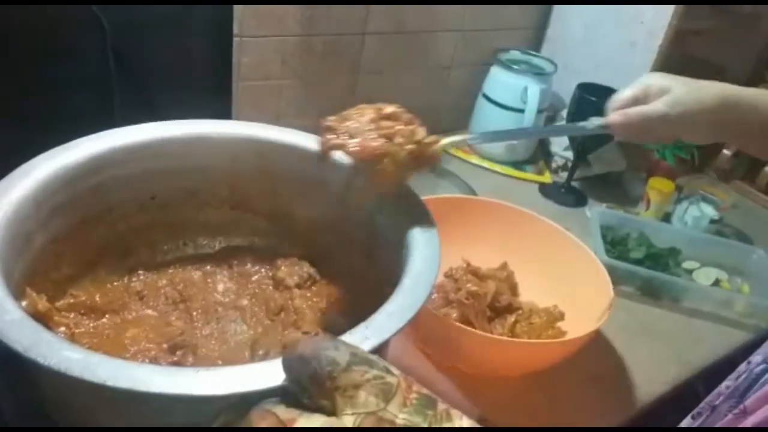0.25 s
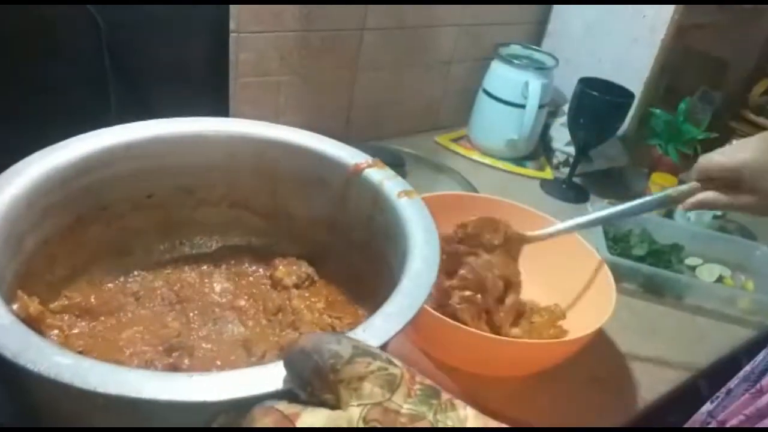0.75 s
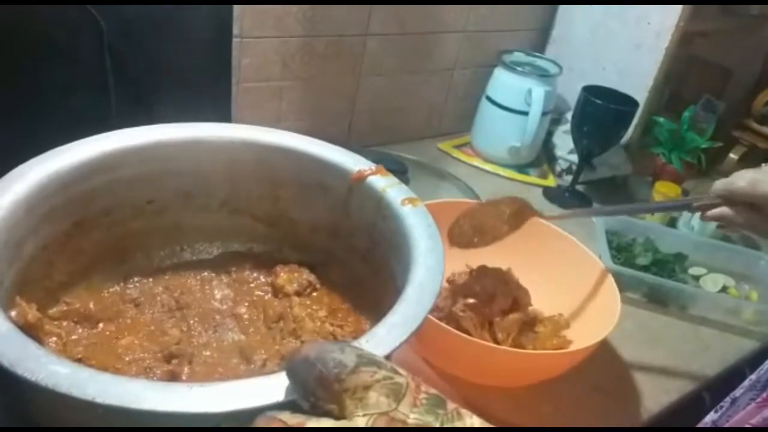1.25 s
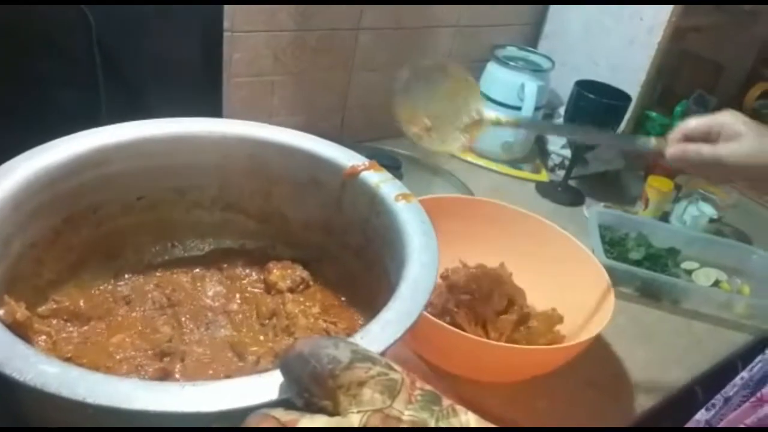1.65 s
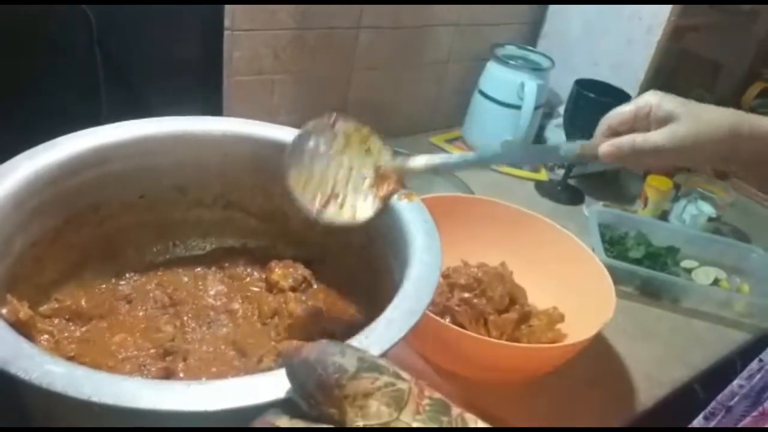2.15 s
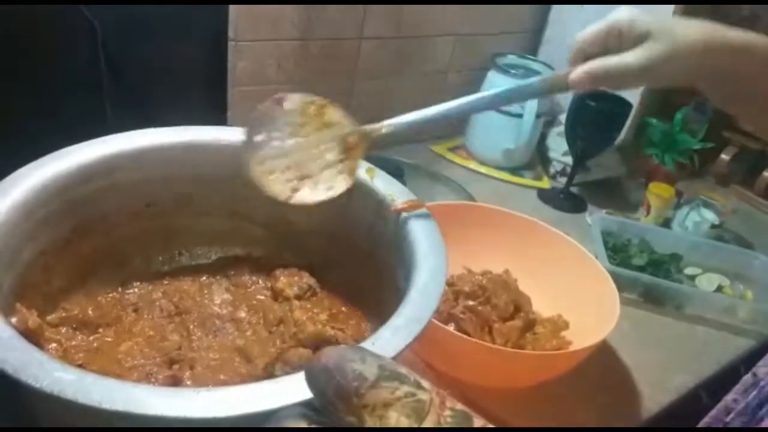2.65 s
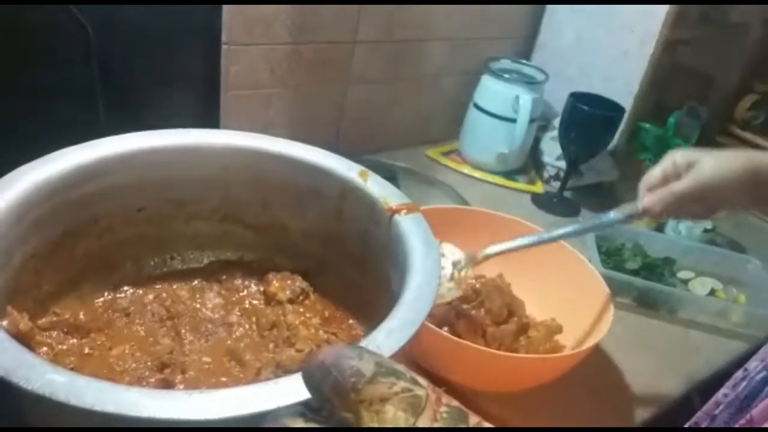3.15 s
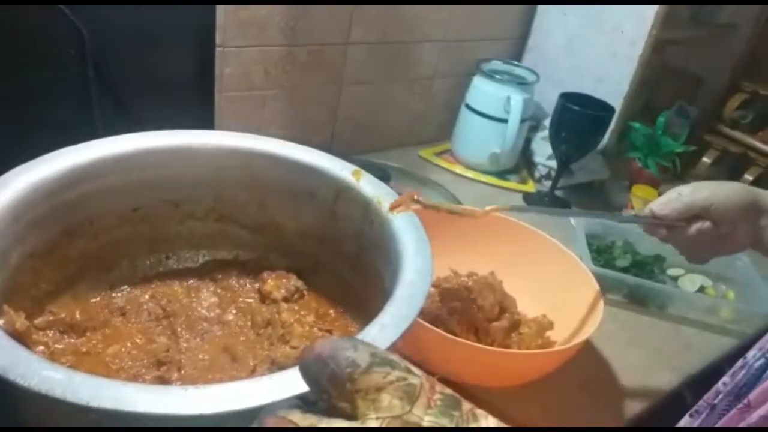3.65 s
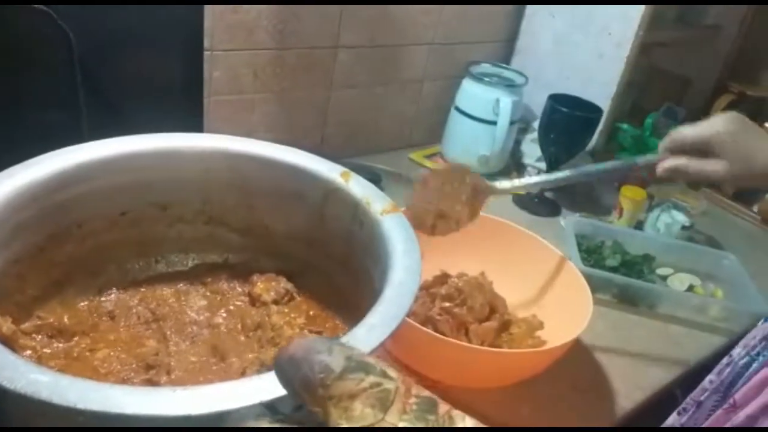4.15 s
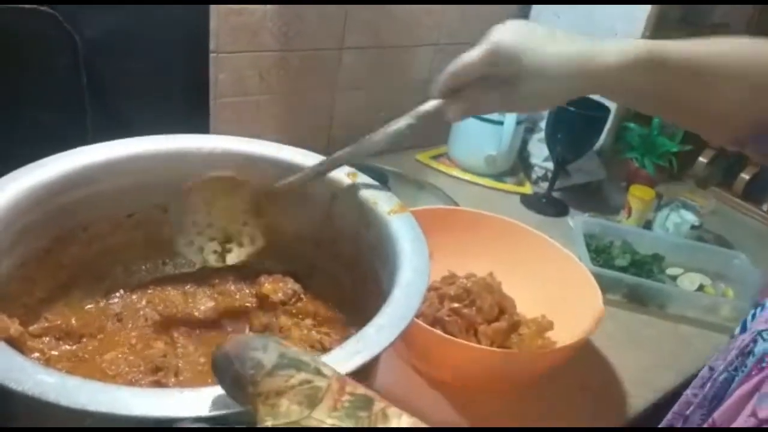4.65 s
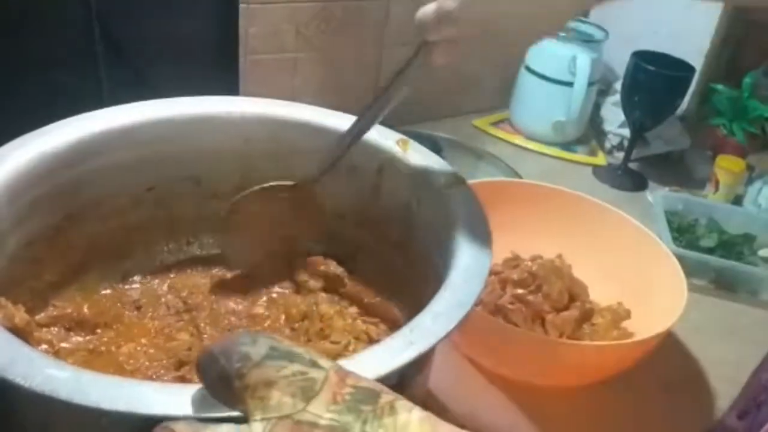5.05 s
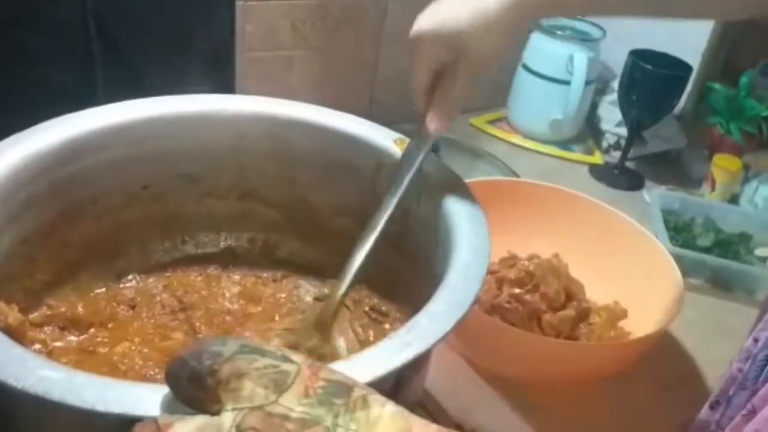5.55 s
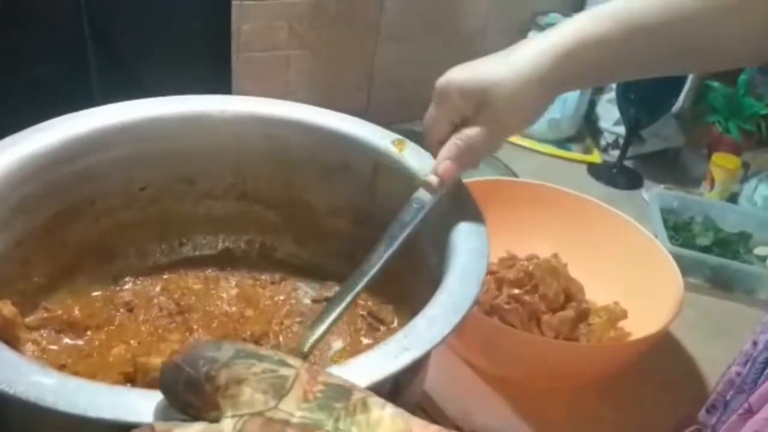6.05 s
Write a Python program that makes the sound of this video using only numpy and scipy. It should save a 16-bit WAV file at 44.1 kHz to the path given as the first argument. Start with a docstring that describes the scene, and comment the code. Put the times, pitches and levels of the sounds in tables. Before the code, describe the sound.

Gravy sizzles steadily in a big aluminium pot while a steel ladle clangs brightly on the rim, then scrapes and squeaks through the food.

```python
"""Ladle in a simmering pot

A steel ladle serves meat from a big aluminium pot while the gravy sizzles, in a small tiled kitchen.
It knocks on the rim and wall (decaying modes and noise), drags and squeals (stick-slip friction)
and bumps through the food (damped cycles). Frying is a dense train of clicks blurred by noise;
a faint resonance of the pot and low coloured noise lie beneath, and sparse reflections add the room."""
import sys
import numpy as np
from scipy import signal
from scipy.fft import rfft, irfft
from scipy.io import wavfile

SR = 44100
rng = np.random.default_rng(int(sys.argv[2]) if len(sys.argv) > 2 else 0)


def int16_out(signal):
    """Quantize to a 16-bit WAV file."""
    q = np.round(np.clip(np.atleast_2d(signal).T, -1, 1) * 32767)
    wavfile.write(sys.argv[1], SR, q.astype(np.int16))


N = 277830
TIME = np.arange(N) / SR
SECOND = TIME[:SR]  # time axis of a single decaying sound


def amp(db):
    """Level definition: decibels to amplitude ratio."""
    return 10 ** (np.asarray(db) / 20)


def unit(x):
    """Normalisation by mean power: scales to rms 1."""
    return x / np.sqrt(np.mean(x ** 2) + 1e-20)


def read(points, hz):
    """Interpolation on a logarithmic frequency axis."""
    f, value = np.transpose(points)
    return np.interp(np.log(hz + 1), np.log(f + 1), value)


def colour(x, spectrum):
    """Spectral shaping: weights each frequency, falling away below the lowest point, at rms 1."""
    hz = np.fft.rfftfreq(len(x), 1 / SR)
    low_fall = np.minimum(hz / spectrum[0][0], 1) ** 2
    gain = amp(read(spectrum, hz)) * low_fall
    return unit(irfft(rfft(x) * gain, len(x)))


def fade(t, t60):
    """Exponential decay: the level falls 60 dB in t60 seconds."""
    return np.exp(-np.log(1000) * t / t60)


def add(mix, s, sound):
    """Superposition: mixes a sound in at time s."""
    part = mix[round(s * SR):][:len(sound)]
    part += sound[:len(part)]


def crackle(per_s, spread_db):
    """Random impulse train: clicks of either sign, a few larger than the rest, at rms 1."""
    size = amp(spread_db * np.minimum(rng.exponential(1, N), 4))
    sign = rng.choice([-1, 1], N)
    happens = rng.random(N) < per_s / SR
    return unit(size * sign * happens)


def wander(per_s):
    """Band-limited random drift: straight lines between per_s random values a second, at rms 1."""
    knots = rng.standard_normal(N)
    return unit(np.interp(TIME * per_s, np.arange(N), knots))


# where the ladle touches the pot
PLACES = ["rim", "rim flat", "rim edge", "outer wall", "inner wall", "low wall"]
# modes of pot and ladle: f/Hz, t60/s, then relative level/dB when touched at each of the PLACES
MODES = [(926, 0.66, -28, -34, -34, -17, -28, -37), (1355, 0.56, -28, -35, -38, -20, -44, -32),
         (1591, 0.44, -53, -41, -37, -22, -46, -37), (1778, 0.6, -43, -60, -35, -35, -39, -44),
         (2040, 0.35, -50, -54, -62, -32, -55, -47), (2315, 0.38, -54, -60, -40, -23, -41, -57),
         (2692, 0.3, -36, -33, -46, -30, -48, -46), (2809, 0.55, -33, -30, -32, -34, -47, -42),
         (3104, 0.3, -32, -35, -27, -44, -23, -49), (3169, 0.35, -26, -30, -43, -25, -24, -37),
         (3205, 0.3, -45, -30, -41, -22, -19, -50), (3275, 0.3, -29, -40, -37, -27, -17, -32),
         (3375, 0.32, -25, -36, -43, -20, -30, -39), (3630, 0.35, -25, -31, -26, -28, -32, -45),
         (3677, 0.33, -47, -48, -38, -19, -32, -52), (3785, 0.3, -51, -46, -39, -22, -24, -34),
         (3829, 0.3, -37, -47, -33, -16, -27, -36), (4167, 0.33, -25, -28, -32, -18, -35, -32),
         (4220, 0.24, -35, -13, -33, -43, -22, -46), (4539, 0.3, -20, -31, -47, -19, -28, -37),
         (4717, 0.28, -17, -46, -49, -26, -42, -50), (4753, 0.28, -30, -36, -44, -16, -26, -49),
         (4961, 0.3, -18, -29, -37, -23, -31, -36), (5305, 0.28, -39, -43, -44, -41, -49, -33),
         (5615, 0.3, -20, -43, -44, -38, -30, -47), (5715, 0.3, -35, -41, -34, -40, -46, -32),
         (5980, 0.25, -19, -44, -43, -16, -44, -48), (6083, 0.3, -42, -45, -46, -18, -29, -46),
         (6592, 0.24, -17, -45, -34, -38, -29, -47), (6845, 0.28, -45, -48, -43, -22, -29, -51)]


def ring(place, swell_s, twin_db=-8, twin_life=0.92, beat_hz=21, twin_lag=0.4):
    """Modal superposition with beating: each mode has a shorter-lived twin, as the pot is not quite round."""
    t, out = SECOND, np.zeros(SR)
    for hz, t60, *levels in MODES:
        start, spread = rng.uniform(-1.0, 1, 2)  # start phase in cycles, side and size of the split
        side = np.sign(spread)
        height = hz / MODES[0][0]
        twin_hz = hz + beat_hz * np.sqrt(height) * side * (.5 + abs(spread))
        main = np.sin(2 * np.pi * (hz * t + start)) * fade(t, t60)
        twin = np.sin(2 * np.pi * (twin_hz * t + start - side * twin_lag)) * fade(t, t60 * twin_life)
        swell = 1 - np.exp(-t * height ** 2 / swell_s)  # low modes take longest to build up
        out += amp(levels[PLACES.index(place)]) * swell * (main + amp(twin_db) * twin)
    return out


# ladle on bare metal: t/s, place, ring level/dB, swell time constant of the lowest mode/s,
# then relative levels of the clash: pot body level/dB, middle level/dB, treble level/dB; clash t60/s
CLINKS = [(1.877, "rim", -1, 0.0071, -28.5, -44, -13, 0.28),
          (2.025, "rim flat", -5, .01, -35, -46, -39, 0.29),
          (2.039, "rim flat", -13, .01, -39, -46, -23, 0.13),
          (2.060, "rim flat", 0, 0.014, -43, -50, -24.5, 0.35),
          (2.198, "rim edge", 0.5, 0.027, -30, -34, -22.5, 0.16),
          (3.204, "outer wall", -1, 0.036, -26, -18, -14.5, 0.34),
          (4.765, "inner wall", 1, 0.012, -29, -32, -15, 0.3),
          (6.204, "inner wall", -23, .003, -31, -28.5, -33, 0.06)]
# spectra of the clash, and of duller contacts below: f/Hz, relative level per Hz/dB
BODY = [(60, -15), (115, -8), (230, -9.5), (310, -5.5), (370, 4), (460, 5), (560, -2), (700, -11),
        (1500, -44)]
MIDDLE = [(300, -25), (700, -2.5), (950, 6), (1400, 0), (1900, -2.5), (2600, -12), (4000, 2), (7000, -12),
          (12000, -37)]
TREBLE = [(1500, -15.5), (2800, -12), (3200, 0.5), (4500, 1), (6600, 2), (7700, -3.5), (8800, -19),
          (11000, -16.5), (16000, -33)]


def clinks(crack_db=3, crack_t60=0.034, chatter_db=-0.1):
    """Impact excitation: a blow starts the clear modes, a chattering cloud of weaker ones and a brief crack."""
    t, clear, clash = SECOND, np.zeros(N), np.zeros(N)
    for s, place, ring_db, swell_s, body_db, middle_db, treble_db, t60 in CLINKS:
        body, middle, treble = (colour(rng.standard_normal(SR), shape) for shape in (BODY, MIDDLE, TREBLE))
        cloud = amp(body_db) * body + amp(middle_db) * middle + amp(treble_db) * treble
        # the ladle rattles slightly, more so after the first contact
        chatter = amp(chatter_db * wander(333)[:SR] * (2 - fade(t, crack_t60)))
        crack = amp(treble_db + crack_db) * colour(rng.standard_normal(SR), TREBLE)
        add(clear, s, amp(ring_db) * ring(place, swell_s))
        add(clash, s, cloud * fade(t, t60) * chatter + crack * fade(t, crack_t60))
    return clear, clash


# blows muffled by food or cloth: t/s, level/dB, pitch f/Hz, t60/s, overtone f/Hz,
# overtone level/dB and tick level/dB (both relative to the blow)
THUDS = [(4.354, -29, 249, 0.027, 696, -9, -14), (4.361, -26, 330, .025, 796, -16, -15),
         (4.381, -44, 140, .06, 400, -66, -25), (4.848, -12, 447, 0.029, 1350, -0.5, -11),
         (5.6355, -9, 490, 0.026, 980, -5, -9.5)]


def thuds(second=1.52, second_db=-6, tick_t60=0.066, contact_s=0.0011):
    """Heavy damping: the loaded bottom of the pot gives a few cycles and a tick."""
    t, out = SECOND, np.zeros(N)
    for s, db, hz, t60, overtone_hz, overtone_db, tick_db in THUDS:
        modes = [(hz, 0), (hz * second, second_db), (overtone_hz, overtone_db)]
        knock = sum(amp(level) * np.cos(2 * np.pi * f * t) for f, level in modes)
        tick = amp(tick_db) * colour(rng.standard_normal(SR), MIDDLE) * fade(t, tick_t60)
        onset = 1 - np.exp(-t / contact_s)
        add(out, s, amp(db) * onset * (tick - knock * fade(t, t60)))
    return out


def pressure(start, length, grip_s=0.033, press_db_per_s=1.5, release_t60=0.38):
    """Contact force of one stroke: it takes hold, presses gradually harder and lets go."""
    t = TIME - start
    hold = amp(press_db_per_s * (np.minimum(t, length) - length / 2))
    return np.clip(t / grip_s, 0, 1) * hold * fade(np.maximum(t - length, 0), release_t60)


# the ladle's edge scratching through the gravy: f/Hz, relative level per Hz/dB
SCRATCH = [(300, -32), (700, -8), (1020, 1.5), (1350, -2.5), (1900, -6), (2600, -6.5), (3200, -7),
           (4000, -3), (5500, -6.5), (8000, -26)]
# strokes over the rim, down the wall, biting into it, through the food, lightly along the bottom:
# start t/s, length/s, place, then relative levels: body drag level/dB, scratch level/dB, ringing level/dB
STROKES = [(1.97, 0.16, "rim flat", -40.5, -43, -35), (4.958, 0.18, "inner wall", -40.5, -39.5, -37),
           (5.152, 0.076, "low wall", -47, -31.5, -29), (5.333, 0.34, "low wall", -45.5, -36, -42),
           (5.764, 0.51, "low wall", -51.5, -44.5, -62)]


def slide(slips_per_s=900, spread_db=0.5, swell_s=0.0015, pressed_t60=0.18, uneven_db=1.5, catches_per_s=25):
    """Stick-slip friction: tiny blows rumble in the body, scratch and keep the wall ringing."""
    slips, out = crackle(slips_per_s, spread_db), np.zeros(N)
    drag = colour(slips, BODY) * amp(uneven_db * wander(catches_per_s))  # lumps of food catch and give way
    scratch = colour(slips, SCRATCH)
    for s, length, place, drag_db, scratch_db, ring_db in STROKES:
        force = pressure(s, length)
        wall = ring(place, swell_s) * fade(SECOND, pressed_t60)  # the pressed ladle damps the wall
        sung = signal.fftconvolve(slips * force, wall / np.linalg.norm(wall))[:N]
        out += force * (amp(drag_db) * drag + amp(scratch_db) * scratch)
        out += amp(ring_db) * sung
    return out


# slips that lock onto a mode of the wall: t/s of the strongest force, half length/s, f/Hz, t60/s,
# level/dB, rms pitch jitter of the force as a share of f
SQUEALS = [(2.005, .025, 1355, .4, -37, .005), (2.11, .03, 1591, .4, -43, .005),
           (5.183, .013, 5305, .04, -22, .02), (5.193, .033, 1591, .48, -23.5, .004),
           (5.2, .025, 5715, .2, -29, .008), (5.205, .025, 3850, .02, -23, .06),
           (6.206, .002, 3950, .01, -16.5, .09), (6.238, .03, 4150, .006, -23, .12)]


def squeals(rough=0.75, slips_per_s=2000):
    """Mode locking: slips fall in step with a mode, which swells and rings out; uneven slips make a rasp."""
    out = np.zeros(N)
    for s, half, hz, t60, db, jitter in SQUEALS:
        grip = np.exp(-((TIME - s) / half) ** 2) * (1 + rough * wander(300))
        phase = 2 * np.pi * np.cumsum(hz * jitter * wander(slips_per_s)) / SR
        # complex envelope of the mode, then moved up to its frequency
        swing = signal.fftconvolve(grip * np.exp(1j * phase), fade(SECOND, t60))[:N]
        swing /= abs(swing).max()
        out += amp(db) * (swing * np.exp(2j * np.pi * hz * TIME)).real
    return out


# strength of the frying: t/s, relative level/dB
HEAT = [(0.0, -28), (1.42, -28), (2.02, -27), (2.39, -30), (3.28, -29), (3.49, -31.5), (4.12, -31),
        (4.32, -33), (4.56, -33), (5.0, -32), (5.95, -33.5), (6.3, -31.5)]


def heat():
    """Source strength: the frying's gain at every sample."""
    return amp(np.interp(TIME, *np.transpose(HEAT)))


# spectra of the frying and its finest spray: f/Hz, relative level per Hz/dB
SIZZLE = [(600, -24.5), (2000, -22.5), (2600, -11.5), (3300, -8.5), (4300, -3.5), (5300, 0), (6800, -.5),
          (7500, -6), (8200, -16.5), (9000, -24), (10500, -16.5), (13000, -24.5)]
FIZZ = [(5000, -34), (8800, -25), (10500, -1.5), (13000, 8), (16000, 4)]


def frying(bursts_per_s=3500, spread_db=2.0, flutter_db=0.17, hiss_db=-2, sizzle_db=0.5,
           fizz_db=-22, bright_at_s=4.3, brighten_s=0.19, brighter_db=12):
    """Shot noise: thousands of small steam bubbles burst in the gravy and blur to a hiss inside the pot."""
    bright = 1 - np.exp(-np.maximum(TIME - bright_at_s, 0) / brighten_s)  # the fizz comes forward and stays
    bursts = crackle(bursts_per_s, spread_db) + amp(hiss_db) * rng.standard_normal(N)
    bursts *= amp(flutter_db * wander(40))
    spray = bursts + 2 * rng.standard_normal(N)
    sizzle = amp(sizzle_db) * colour(bursts, SIZZLE)
    fizz = amp(fizz_db + brighter_db * bright) * colour(spray, FIZZ)
    return heat() * (sizzle + fizz)


# resonances of the pot stirred by the simmer: f/Hz, half-width at half amplitude/Hz, level/dB
HOLLOW = [(446, 19, -55.5), (926, 36, -57), (1572, 20, -60)]


def hollow():
    """Resonance under random excitation: the simmer keeps the pot faintly sounding."""
    f, out = np.fft.rfftfreq(N, 1 / SR), np.zeros(N)
    for hz, width, db in HOLLOW:
        response = 1 / (1 + ((f - hz) / width) ** 2)
        out += amp(db) * unit(irfft(rfft(rng.standard_normal(N)) * response, N))
    return out


# spectrum of the stove and simmer: f/Hz, relative level per Hz/dB
KITCHEN = [(25, -32), (45, -13), (62, -9.5), (95, 2.5), (125, -2.5), (250, -2.5), (340, -2.5), (450, -3),
           (600, -6), (900, -3), (1150, -6), (2200, -6), (5000, -19.5)]


def background(level_db=-43, follow=0.55):
    """Broadband noise: the low sound of stove and simmer, swelling a little with the frying."""
    return amp(level_db) * unit(heat() ** follow) * colour(rng.standard_normal(N), KITCHEN)


# reverberation of the room: f/Hz, t60/s
ROOM = [(150, 0.99), (700, 0.29), (3000, 0.76), (8000, 0.22), (16000, 0.18)]


def room(x):
    """Reverberation: sparse reflections from the tiles, each band dying at its own speed."""
    taps = rng.choice([-1., 1.], SR) * (rng.random(SR) < 1 / 10)
    taps[:SR // 200] = 0  # no reflection in the first 5 ms
    hz, t, z = signal.stft(taps, SR, nperseg=256)
    tail = signal.istft(z * fade(t, read(ROOM, hz)[:, None]), SR, nperseg=256)[1]
    return signal.fftconvolve(x, tail / np.linalg.norm(tail))[:N]


def scene():
    """Superposition of direct and reflected sound, heard from one spot above the pot."""
    (clear, clash), dull, scraping = clinks(), thuds(), slide()
    ringing = clear + squeals()
    wet = room(amp(-17) * ringing + amp(-10) * clash + amp(-3.5) * dull + amp(-7.0) * scraping)
    mono = ringing + clash + dull + scraping + wet + frying() + hollow() + background()
    return np.array([mono, mono])


# upper band limit: f/Hz
EDGE_HZ = 16050


def record(dry, low_cut_hz=48):
    """Transduction: a small microphone drops deep bass, rounds peaks near full scale and limits the band."""
    thin = signal.sosfilt(signal.butter(4, low_cut_hz, "high", fs=SR, output="sos"), dry)
    rounded = thin / (1 + thin ** 6) ** (1 / 6)
    low_pass = signal.firwin(511, EDGE_HZ, window=("kaiser", 9), fs=SR)
    return signal.oaconvolve(rounded, low_pass[None], "same")


dry = scene()
out = record(dry)
int16_out(out)
```